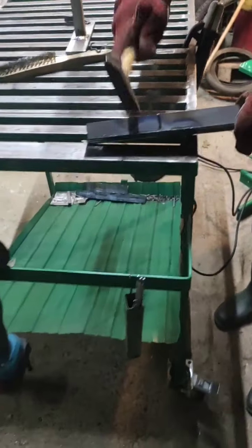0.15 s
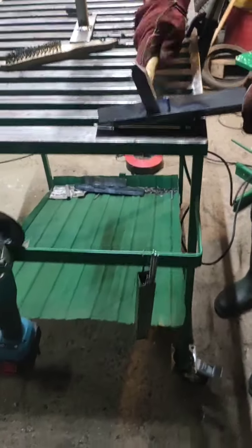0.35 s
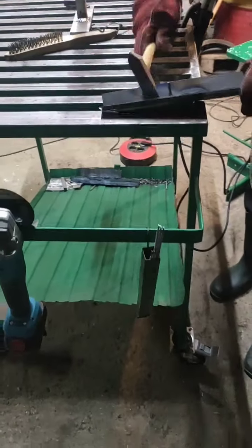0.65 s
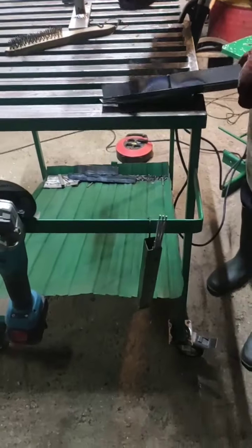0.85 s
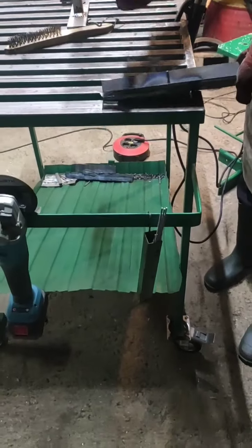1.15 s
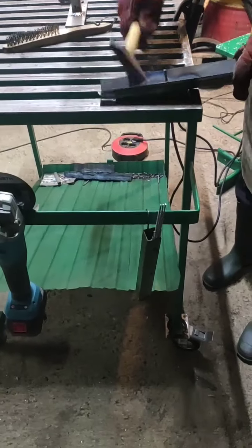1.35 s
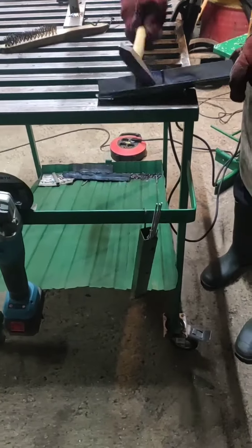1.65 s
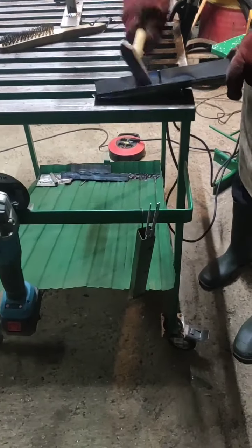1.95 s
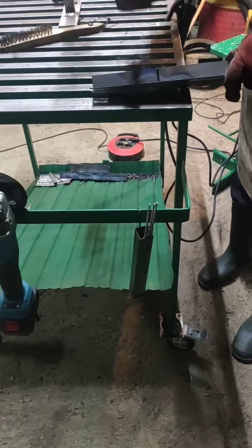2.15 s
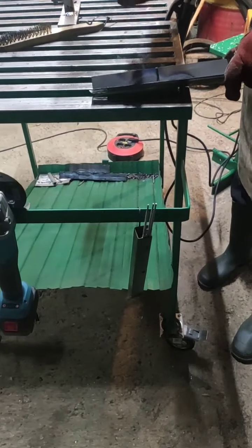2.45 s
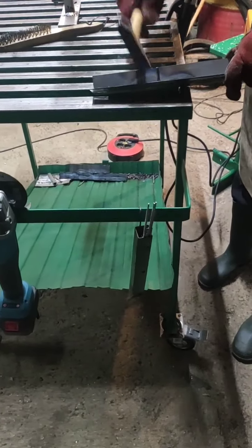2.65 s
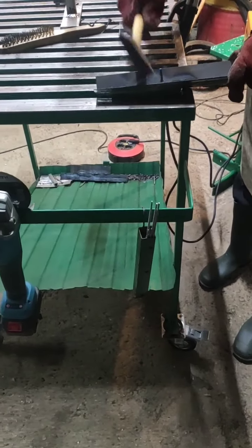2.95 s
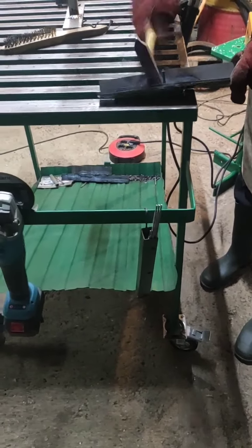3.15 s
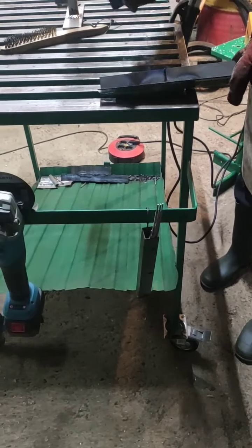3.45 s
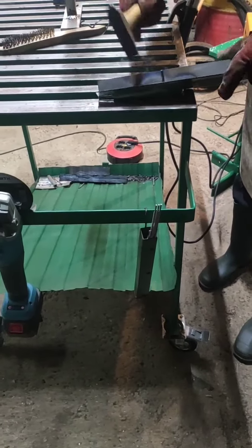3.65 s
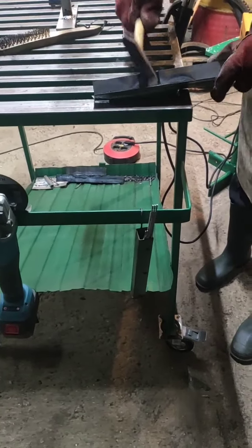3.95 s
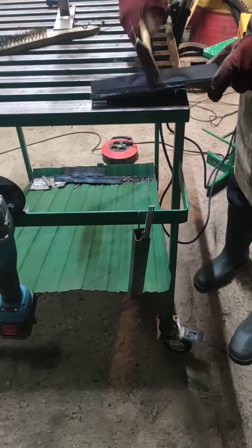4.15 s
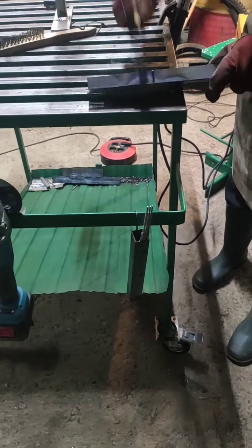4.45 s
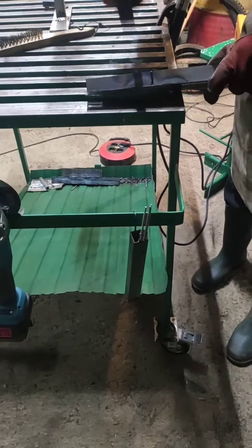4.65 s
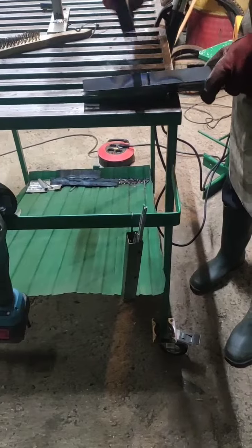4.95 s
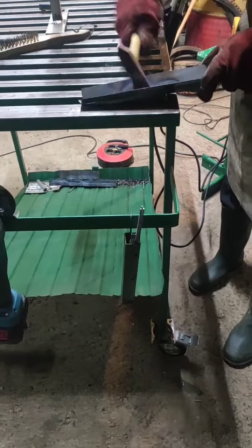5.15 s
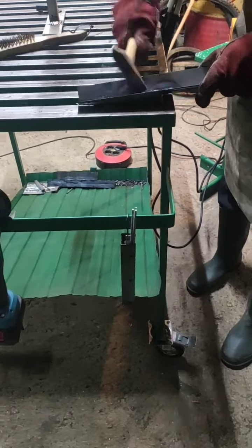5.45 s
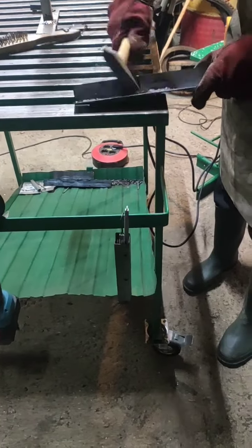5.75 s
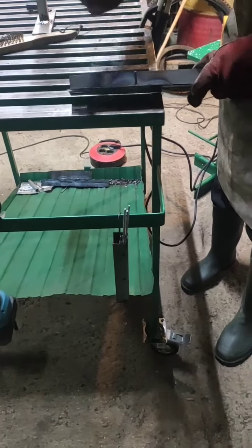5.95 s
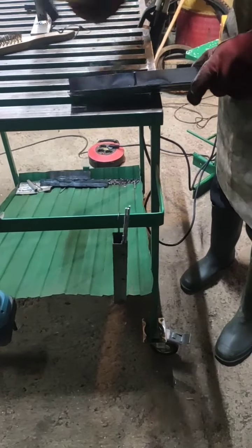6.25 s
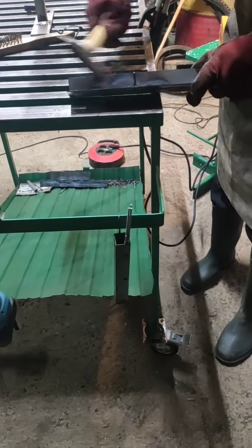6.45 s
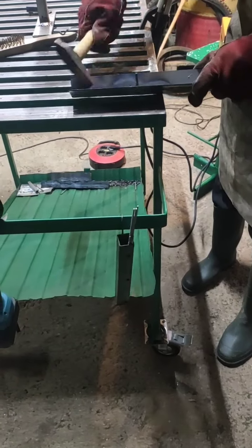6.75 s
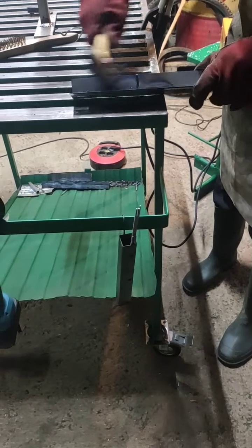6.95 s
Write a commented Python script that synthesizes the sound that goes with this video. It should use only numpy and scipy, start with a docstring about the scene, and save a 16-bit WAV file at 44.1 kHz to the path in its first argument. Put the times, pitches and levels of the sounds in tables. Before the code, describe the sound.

Steady hard hammer blows ring a steel bar and boom a hollow metal cart in a workshop, with brief gritty rattles and a weak dragging finish.

```python
"""A hammer knocks slag off a welded steel bar held on the slatted top of a steel cart in a workshop.
Over faint steady air each blow sets the cart booming, bar and slats ringing and the frame clattering;
grit skitters briefly between blows, and at the end the hammer only drags and taps.
Ringing parts are decaying sines with beating neighbours, clatter is noise bands with decaying energy, and
clanks and clinks are bunches of partials; one narrow-band microphone is driven into its limiter and clips."""
import sys
import numpy as np
from scipy import signal
from scipy.fft import rfft, irfft
from scipy.io import wavfile
from scipy.ndimage import uniform_filter1d

SR = 44100
rng = np.random.default_rng(int(sys.argv[2]) if len(sys.argv) > 2 else 0)


def store_pcm(level_fs):
    """Save levels as 16-bit WAV."""
    pcm = np.round(np.clip(level_fs, -1, 1) * 32767).astype(np.int16)
    wavfile.write(sys.argv[1], SR, np.atleast_2d(pcm).T)


N = 312669

# hammer blows: (time [s], strength [dB], decay stretch [factor], clank pitch [Hz],
# bar share [dB], share of the linked modes [dB], shelf share [dB])
BLOWS = [(-0.16, -4.5, 0.85, 5500, -25, -13, -2), (0.142, -4.5, 1.054, 5580, -9.5, -17, 1),
         (0.462, -5, 1.21, 4330, -20, -23, -8), (0.771, -7, 1.065, 4000, -16, -15, 5.5),
         (1.071, -6, 0.97, 5830, -13, -15, 1.5), (1.388, -6.5, 1.024, 5630, -12, -14, -9),
         (1.714, -5.5, 1.05, 4490, -12, -15, -2), (2.024, -3.5, 0.91, 5260, -3, -18, 0.5),
         (2.34, 0.5, 0.87, 5830, -7, 1.5, -3), (2.666, -2, 0.88, 5040, -4, -5, -5),
         (2.973, -1, 0.9, 5220, -3, 6.5, -5.5), (3.276, 0.15, 0.96, 5900, -4.5, -3, -13),
         (3.867, -21, 0.95, 5820, -9, -12.5, 2), (4.278, -4, 0.88, 7030, -9, -21, 0.5),
         (4.596, -3, 0.96, 5770, -4.5, -10, 1.1), (4.921, -2.5, 0.93, 5180, -3, -8, -18),
         (5.233, -4.5, 0.99, 5230, -1.5, -17, -0.5), (5.542, -3, 0.91, 5810, -0.5, -11, -1.5),
         (5.852, -3, 0.9, 5790, 0.7, -6, -7), (6.151, -4.5, 1, 5770, -1, -0.5, 5.5),
         (6.442, -5, 0.78, 5700, 0, 1.5, -0.5)]


def from_db(db):
    """Level and amplitude: 20 dB is a tenfold gain."""
    return np.exp(np.asarray(db) * (np.log(10) / 20))


def at_hz(points, hz):
    """Spectral interpolation: read a table along a logarithmic frequency axis."""
    table_hz, value = np.array(points).T
    return np.interp(np.log(hz), np.log(table_hz), value)


def noise_bands(lumpy_db=4, lump_hz=14):
    """Modal crowding: third-octave noise, with its centres, bunched into fine lines like close modes."""
    hz = np.fft.rfftfreq(N, 1 / SR)
    lumps = rng.standard_normal((2, int(hz[-1] / 8) + 2))
    weight = [from_db(lumpy_db * np.interp(hz / lump_hz, np.arange(len(row)), row)) for row in lumps]
    white = irfft(rfft(rng.standard_normal((2, N))) * weight, N)
    white /= white.std()
    edges = 14 * 2 ** np.arange(0, 9.4, 1 / 3)
    bands = []
    for k, (low, high) in enumerate(zip(edges, edges[1:])):
        band_pass = signal.butter(2, [low, high], "band", fs=SR, output="sos")
        # neighbouring bands draw on different noise
        bands.append((np.sqrt(low * high), signal.sosfilt(band_pass, white[k % 2])))
    return bands


def since(s, span):
    """Causality: the samples that follow an event, and the time gone since it."""
    first = max(0, int(np.ceil(s * SR)))
    part = slice(first, min(N, int((s + span) * SR)))
    return part, np.arange(part.start, part.stop) / SR - s


def by_strength(usual, per_db):
    """Dependence on force: a straight line in dB about the strength of an ordinary blow, -4 dB."""
    return usual + per_db * (np.array(BLOWS)[:, 1] + 4)


def cart_share():
    """Energy sharing: the more the linked modes ring, the less of the blow booms in the cart [dB]."""
    linked_db = np.array(BLOWS)[:, 5]
    return by_strength(usual=-3.5, per_db=-0.28) - 0.1459 * (linked_db + 12)


def cluster(t, hz, width_hz, count):
    """Beating: close partials around each pitch interfere and make the ring lumpy."""
    detune, phase = rng.standard_normal((2, count, len(hz), 1))
    partials = np.sin(2 * np.pi * ((hz + width_hz * detune) * t + phase))
    return partials.sum(axis=0) / np.sqrt(count)


def rings(modes, share_db, swell, spread_db, width_hz, partner_db, stretch, size=0.73, loose=1):
    """Modal superposition: every blow excites decaying modes unevenly; weaker or stronger partners beat.
    swell and size (rise time, length) are in s; loose scatters phases that otherwise alternate in sign."""
    out = np.zeros(N)
    hz, level_db, t60 = np.array(modes).T[:, :, None]
    opposition = np.arange(len(modes))[:, None] / 2
    for (s, db, length, *_), part_db in zip(BLOWS, share_db):
        part, t = since(s, span=size)
        uneven, phase = rng.standard_normal((2, len(modes), 1))
        decay_db = -60 * t / (t60 * stretch * length)
        gain = from_db(db + part_db + level_db + spread_db * uneven + decay_db)
        tone = np.sin(2 * np.pi * (hz * t + loose * phase + opposition))
        tone += from_db(partner_db) * cluster(t, hz, width_hz, count=3)
        fade_out = np.minimum(1, 5 * (1 - t / size))
        out[part] += (1 - np.exp(-t / swell)) * fade_out * (gain * tone).sum(axis=0)
    return out


def bunches(strikes, swell=0.001):
    """Inharmonicity: each strike rings as a bunch of close partials, rough where they spread widely.
    Strikes are (time [s], pitch [Hz], level [dB], t60 [s], spread of partials [Hz])."""
    out = np.zeros(N)
    for s, hz, db, t60, spread_hz in strikes:
        part, t = since(s, span=0.31)
        bunch = cluster(t, np.array([[hz]]), spread_hz, count=8)[0]
        out[part] += (1 - np.exp(-t / swell)) * from_db(db - 60 * t / t60) * bunch
    return out


def hush(bands):
    """Stationary noise: workshop air holds a fixed spectrum and level."""
    # spectrum of the air: (frequency [Hz], relative level [dB per Hz])
    air_spectrum = [(24, -62), (40, -12), (314, -29), (375, -6), (490, -2), (730, -16), (8000, -48),
                    (10400, -61.5), (17600, -120)]
    air = sum(from_db(at_hz(air_spectrum, hz)) * noise for hz, noise in bands)
    return from_db(-58) * air / air.std()


def contacts():
    """Excitation: blows, the faint ticks ahead of them and light touches, as clatter receives them.
    Each is (time [s], strength [dB], boom [dB], brightness [dB/octave], swell [s], stretch, crack [dB])."""
    # light touches, drags and rebounds of loose steel:
    # (time [s], strength [dB], brightness [dB per octave], decay stretch [factor])
    touches = [(0.673, -29, 8, 0.28), (2.601, -13.5, 11, 0.34), (2.791, -27, 11, 2.1),
               (3.836, -33.5, 2.5, 0.47), (3.876, -17, 3.5, .51), (4.49, -30, -4, 0.43),
               (4.56, -39, -5, .4), (5.635, -16, 0, 0.34), (6.634, -22, 2, 0.99), (6.678, -19.5, 0.5, 0.55),
               (6.732, -24, .1, 0.57), (6.784, -22.5, 1.4, 0.81), (6.823, -21.5, 3.5, .22),
               (6.927, -28.5, -0.1, 1.6), (7.047, -22.5, 2, .84)]
    blow_swell = 0.0019
    bright_db_oct = by_strength(usual=2.5, per_db=0.23)
    crack_db = by_strength(usual=0.5, per_db=-0.5)
    hits = []
    for (s, db, stretch, *_), boom, bright, crack in zip(BLOWS, cart_share(), bright_db_oct, crack_db):
        hits.append((s, db, boom, bright, blow_swell, stretch, crack))
        # a faint bright tick 3.4 ms ahead of each blow, without boom or crack
        hits.append((s - 0.0034, db - 20, -np.inf, 6.5, blow_swell, 0.1, -np.inf))
    for s, db, bright, stretch in touches:
        swell = 0.026 if bright > 8 else 0.0059   # the brightest skitter in slowly
        hits.append((s, db, 2.5 - 3 * bright, bright, swell, stretch, -np.inf))   # dull touches boom
    return hits


def clatter(bands, gain_db=8):
    """Statistical energy: each contact fills every band, which swells briefly and dies at its own rate."""
    # countless close modes and the walls: (frequency [Hz], relative level [dB per Hz])
    clatter_spectrum = [(16, -13.5), (45, -8.5), (85, -10.5), (161, -4.5), (246, 10), (330, 3), (600, -4),
                        (774, -1.43), (1180, -2), (2100, -1.5), (3300, -6.5), (5820, -6.5), (7300, -15.5),
                        (8000, -6.5), (10400, -48.5)]
    # their decay: (frequency [Hz], t60 before stretching [s])
    clatter_t60 = [(25, 1.36), (80, 0.36), (250, 0.78), (500, 0.73), (1100, 0.58), (2900, 0.49),
                   (5000, 0.48), (8000, 0.38)]
    late_db, late_stretch = -17.5, 1.93   # slower tail of the hall
    crack_t60 = 0.039   # s, first bright burst of the contact
    step = 32   # samples between energy values
    clock = np.arange(N // step + 2) * step / SR
    out = np.zeros(N)
    hits = contacts()
    for hz, noise in bands:
        energy = np.zeros(len(clock))
        t60 = at_hz(clatter_t60, hz)
        for s, db, boom_db, tilt_db, swell, stretch, crack_db in hits:
            first = max(0, int(np.ceil(s * SR / step)))
            part = slice(first, first + 2000)
            t = clock[part] - s
            colour_db = boom_db if hz < 450 else tilt_db * np.log2(hz / 2000)
            rise = 1 - np.exp(-t / (swell + 0.6 / hz))   # lows build up later
            # energy is amplitude squared: every dB counts twice
            fall = from_db(-120 * t / (t60 * stretch))
            fall += from_db(2 * late_db - 120 * t / (t60 * late_stretch))
            crack = (hz > 1500) * from_db(2 * crack_db - 120 * t / crack_t60)
            energy[part] += from_db(2 * (db + colour_db)) * (rise ** 2 * fall + crack)
        envelope = np.interp(np.arange(N) / step, np.arange(len(energy)), np.sqrt(energy))
        out += from_db(at_hz(clatter_spectrum, hz) + gain_db) * envelope * noise
    return out


def cart_boom():
    """Plate resonance: sheet and frame of the cart boom in a few low modes."""
    # cart modes: (frequency [Hz], relative level [dB], t60 before stretching [s])
    cart_modes = [(138.8, -20.5, 0.64), (196.4, -21.5, 1), (218.1, -13, 0.81), (250, -4.5, 0.4),
                  (251.6, -13, 1), (280.5, -9.5, 0.6), (319, -24, 0.87), (418.7, -14, 0.6),
                  (926, -19.5, 0.65), (1028, -27, 1)]
    return from_db(0.5) * rings(cart_modes, cart_share(), swell=0.019, spread_db=2.0, width_hz=9.15,
                                partner_db=-2, stretch=0.87, size=0.7)


def shelf_ring():
    """Sympathetic resonance: the lower shelf answers each blow by its own share."""
    # shelf modes: (frequency [Hz], relative level [dB], t60 before stretching [s])
    shelf_modes = [(720, -28, 1.3), (781, -16, .9)]
    return rings(shelf_modes, np.array(BLOWS)[:, 6], swell=0.015, spread_db=1.5, width_hz=10.6,
                 partner_db=-1.5, stretch=0.77, size=0.9)


def tray_ring():
    """Light damping: a tray under the top rings on long after the blow."""
    # tray modes: (frequency [Hz], relative level [dB], t60 before stretching [s])
    tray_modes = [(380.3, -25, 2.8), (387, -26, 2)]
    return rings(tray_modes, by_strength(usual=-4, per_db=0.2), swell=0.018, spread_db=2.4, width_hz=9.2,
                 partner_db=-13, stretch=0.84, size=1.5)


def bar_ring():
    """Bar modes: the held bar rings at inharmonic pitches, almost at once."""
    # bar modes: (frequency [Hz], relative level [dB], t60 before stretching [s])
    bar_modes = [(1610, -27, .8), (1760, -26, .5), (1988, -21, .6), (2040, -21, .6), (2119, -19, .7),
                 (3553, -23, .6)]
    return rings(bar_modes, np.array(BLOWS)[:, 4], swell=0.00048, spread_db=3.0, width_hz=22,
                 partner_db=3.5, stretch=1.24)


def slat_ring():
    """Coupling by contact: the slats ring less once the bar is shifted along the top."""
    # slat modes: (frequency [Hz], relative level [dB], t60 before stretching [s])
    slat_modes = [(4464, -26, .45), (5788, -24, .45), (5850, -28, .4), (6503, -29, .5), (6652, -26, .5),
                  (7480, -28, .4)]
    bar_moved_s = 3.1
    share_db = np.where(np.array(BLOWS)[:, 0] < bar_moved_s, 2, -15)
    return rings(slat_modes, share_db, swell=0.0021, spread_db=4.0, width_hz=30, partner_db=2.5, stretch=1.7)


def rail_ring():
    """Nonlinear excitation: the edge rail's share rises steeply with the strength of the blow."""
    # rail modes: (frequency [Hz], relative level [dB], t60 before stretching [s])
    rail_modes = [(5201, -22, .55), (5990, -22, .45), (6239, -20, .5)]
    return rings(rail_modes, by_strength(usual=-6, per_db=3.6), swell=0.004, spread_db=0.5, width_hz=90,
                 partner_db=-8.5, stretch=0.5)


def linked_ring():
    """Common excitation: modes rise and fall together, a close beating pair near 2190 Hz and one high ring."""
    # linked modes: (frequency [Hz], relative level [dB], t60 before stretching [s])
    linked_modes = [(2186, -18, 1.2), (2193, -20, 1.1), (5946, -17.5, .7)]
    return rings(linked_modes, np.array(BLOWS)[:, 5], swell=0.011, spread_db=1.6, width_hz=14,
                 partner_db=-12, stretch=0.92, size=0.7, loose=0.03)


def clanks():
    """Impact: the hammer face clanks at each blow in proportion to its strength."""
    return bunches([(s, hz, db - 7, 0.21, 200) for s, db, _, hz, *_ in BLOWS])


def clinks():
    """Free vibration: short clinks, plus a few narrow tones of slats and bar ringing on."""
    # clinks and tones: (time [s], pitch [Hz], level [dB], t60 [s], spread of partials [Hz])
    clink_tones = [(1.1, 6760, -34, 3.6, 3.1), (2.614, 5300, -10, 0.18, 360), (2.618, 4470, -14, .12, 260),
                   (2.72, 5150, -13, .49, 160), (2.8, 5360, -21.5, 1.1, 180),
                   (2.821, 4250, -22.5, 1.6, 260), (6.16, 3660, -12, 0.51, 70),
                   (6.19, 4430, -14.5, 0.52, 90), (6.632, 5200, -27, .15, 300),
                   (6.649, 1490, -20.5, .18, 82), (6.68, 2880, -30, .15, 50), (6.73, 2810, -19.5, .12, 80),
                   (6.73, 4520, -24, .11, 89), (6.787, 5200, -26, .073, 200),
                   (6.82, 5540, -17.5, 0.078, 130), (6.925, 1764, -29.5, .34, 174),
                   (7.045, 1750, -32, .15, 130)]
    return bunches(clink_tones)


def grit(count=40):
    """Random impacts: grit skitters as tiny clinks of random moment, pitch and strength."""
    # skittering stretches: (start [s], length [s], level of the strongest [dB], lowest [Hz], highest [Hz])
    skitters = [(2.68, .28, -25, 3800, 7800), (6.601, .3, -31, 1196, 6000)]
    grains = []
    for start, length, db, low_hz, high_hz in skitters:
        for when, pitch, size in rng.random((count, 3)):
            hz = low_hz * (high_hz / low_hz) ** pitch
            grains.append((start + length * when, hz, db + 4 * np.log(size + 1e-3), 0.05, 150))
    return bunches(grains)


def scene():
    """Superposition: all sources add at one microphone, copied to both channels."""
    bands = noise_bands()
    noise = hush(bands) + clatter(bands)
    cart = cart_boom() + shelf_ring() + tray_ring()
    steel = bar_ring() + slat_ring() + rail_ring() + linked_ring()
    clinking = clanks() + clinks() + grit()
    return np.tile(noise + cart + steel + clinking, (2, 1))


def limiter(x, ceiling_db=3, release_db_s=150, ratio=0.41):
    """Gain control: part of the excess over the ceiling is cut; the held peak level falls steadily."""
    slope = release_db_s * np.arange(N) / SR
    level_db = 20 * np.log10(np.abs(x) + 1e-6)
    held_db = np.maximum.accumulate(level_db + slope) - slope
    excess_db = uniform_filter1d(np.maximum(held_db - ceiling_db, 0), size=88)   # smoothed over 2 ms
    return x * from_db(-ratio * excess_db)


def record(dry):
    """Nonlinear distortion: limiter, lopsided saturating capsule, narrow converter, then clipping
    that sprays faint treble above the band."""
    saturation = 1.215   # swing at which the capsule flattens
    converter_hz, cutoff_hz = 9090, 16300
    ceiling, knee = 0.98, 19   # clipping level and its sharpness
    level = limiter(from_db(1.5) * dry[0])
    level = level + 0.11 * level ** 2   # uneven swing turns each burst into a low thump
    level = saturation * np.tanh(level / saturation)
    narrow = signal.sosfilt(signal.cheby2(12, 70, converter_hz, fs=SR, output="sos"), level)
    clipped = narrow / (1 + np.abs(narrow / ceiling) ** knee) ** (1 / knee)
    smooth = signal.sosfilt(signal.cheby2(16, 70, cutoff_hz, fs=SR, output="sos"), clipped)
    return np.tile(smooth, (2, 1))


dry = scene()
out = record(dry)
store_pcm(out)
```